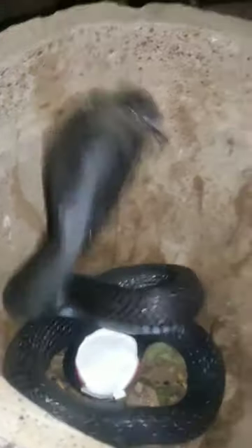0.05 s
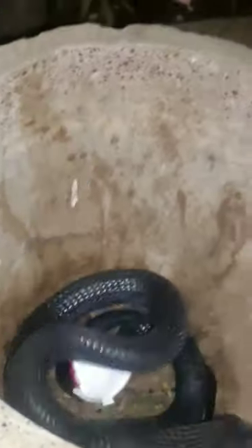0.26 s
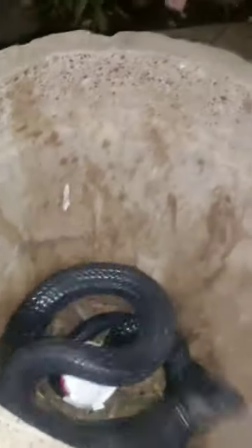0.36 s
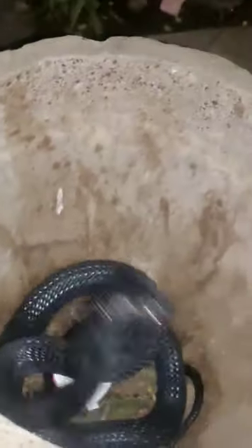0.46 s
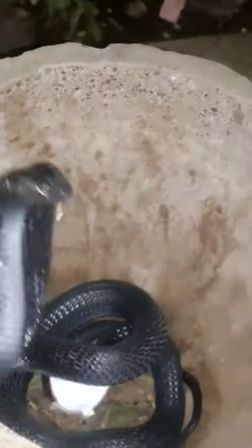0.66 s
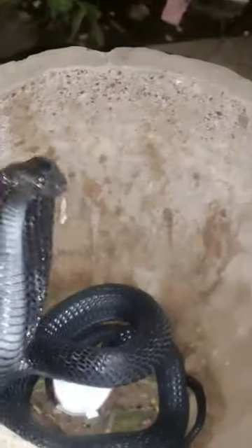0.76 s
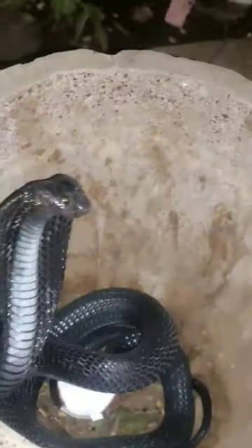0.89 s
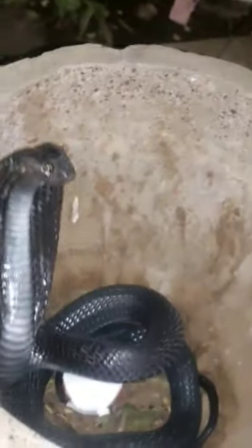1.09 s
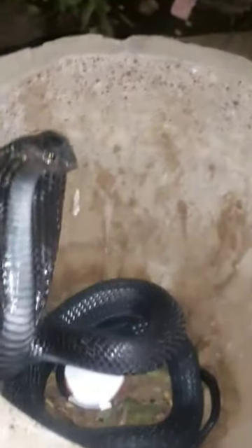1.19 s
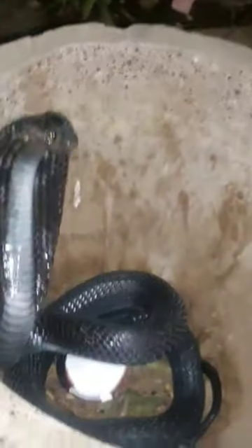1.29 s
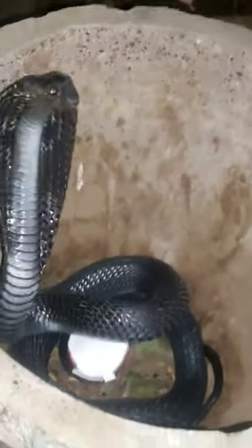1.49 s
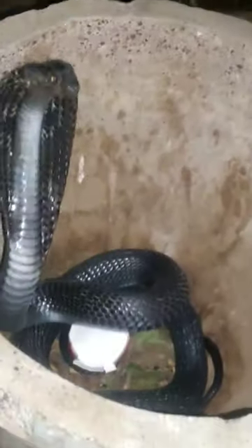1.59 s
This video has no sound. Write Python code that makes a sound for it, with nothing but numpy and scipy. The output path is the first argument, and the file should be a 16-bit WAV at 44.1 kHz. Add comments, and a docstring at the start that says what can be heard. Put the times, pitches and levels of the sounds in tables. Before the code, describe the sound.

One sharp, breathy snake hiss, followed by faint sliding scales over a low outdoor rumble.

```python
"""A concrete basin outdoors, where a coiled cobra lunges with one sharp hiss close to the microphone.
Air rushes through its windpipe and open mouth: a hollow throat tone, a breathy whistle, a wide sizzle.
Then its scales slide and scuff as it rears up again, and the curved wall throws back short echoes.
Two small ticks sound over a low rumble, a thin wash of air and a faint rising drone."""
import sys
import numpy as np
from scipy import signal
from scipy.fft import rfft, irfft
from scipy.io import wavfile
from scipy.ndimage import uniform_filter1d

SR = 44100
rng = np.random.default_rng(int(sys.argv[2]) if len(sys.argv) > 2 else 0)


def waveform_to_disk(signal):
    """Save audio, clipped to [-1, 1], as 16-bit WAV at the path in sys.argv[1]."""
    frames = np.transpose(np.atleast_2d(signal))
    scaled = np.clip(frames, -1, 1) * 32767
    samples = np.round(scaled).astype(np.int16)
    wavfile.write(sys.argv[1], SR, samples)


N = 72765
TIME, HZ = np.arange(N) / SR, np.fft.rfftfreq(N, 1 / SR)


def amp(db):
    """Decibels to gain."""
    return 10 ** (np.asarray(db) / 20)


def unit(x):
    """Scales to rms 1."""
    return x / np.sqrt(np.mean(x ** 2) + 1e-20)


def over_hz(points):
    """Reads a table along log frequency."""
    hz, value = np.transpose(points)
    return np.interp(np.log(HZ + 1), np.log(hz + 1), value)


def over_time(points, column=1):
    """Reads one column of a table along time."""
    rows = np.array(points)
    return np.interp(TIME, rows[:, 0], rows[:, column])


def breath(points, column=1, fade_db_per_s=250):
    """Gain from a level curve that dies away beyond its ends."""
    outside_s = np.maximum(points[0][0] - TIME, 0) + np.maximum(TIME - points[-1][0], 0)
    return amp(over_time(points, column) - fade_db_per_s * outside_s)


def stroke(start_s, length_s, db):
    """A smooth swell and release."""
    return amp(db) * np.sin(np.pi * np.clip((TIME - start_s) / length_s, 0, 1))


def bell(hz, width_hz):
    """A resonance over frequency, 1 at its centre."""
    return 1 / (1 + (2 * (HZ - hz) / width_hz) ** 2)


def flutter(depth_db, rate_hz):
    """A random flicker in level."""
    wobble = irfft(rfft(rng.standard_normal(N)) * bell(0, 2 * rate_hz), N)
    return amp(depth_db * unit(wobble))


def steadied(x, size=2600):
    """Holds the slow level of a narrow noise band constant."""
    return x / np.sqrt(abs(uniform_filter1d((x ** 2).mean(0), size)) + 1e-12)


# Stereo width, near and far. Each row: frequency in Hz, correlation of left and right.
NEAR_LIKENESS = [(30, .9), (80, .99), (450, .985), (1000, .95), (1400, .6), (2800, .5), (4000, .2),
                 (7000, .1), (14000, .15)]
DISTANT_LIKENESS = [(20, .65), (45, .9), (80, .99), (130, .98), (250, .88), (600, .72), (1200, .45),
                    (3000, .15), (14000, .1)]
# Panning, near and far. Each row: frequency in Hz, left minus right in dB.
NEAR_PAN = [(150, 0), (380, 3), (600, -1), (1000, -2.5), (1300, -5), (1700, 3), (2100, 5), (2600, 0),
            (3700, -4), (4500, 1), (6400, -1), (7100, 1), (7750, 7), (9000, 4), (12000, 2)]
DISTANT_PAN = [(30, 7), (80, -1.2), (400, 1.5), (1500, -2), (4000, 2), (6400, 0), (7700, 8.5), (12000, 1.5)]


def noise(spectrum, likeness=NEAR_LIKENESS, pan=NEAR_PAN):
    """Stereo noise of a given colour, width and panning, at rms 1."""
    common, separate = rfft(rng.standard_normal((2, N)))
    same, lean = np.clip(over_hz(likeness), -1, 1), amp(over_hz(pan))
    right = same * common + np.sqrt(1 - same ** 2) * separate
    pair = np.array([lean * common, right]) / np.sqrt(1 + lean ** 2)
    return unit(irfft(pair * spectrum, N))


# Colours of the outdoor bed. Each row: frequency in Hz, relative level in dB.
RUMBLE_EQ = [(15, -27), (30, 2), (50, -8.5), (75, 6), (95, -1.5), (118, 0), (145, -12), (200, -15.5),
             (300, -27), (600, -53.5)]
AIR_EQ = [(180, -43), (300, -5), (629, -9.5), (670, -11), (750, -9.5), (1050, -14), (2130, -16),
          (2510, -18.5), (3870, -15), (4330, -23.5), (6580, -13), (8780, -27), (14000, -35)]
# The rumble's slow swells. Each row: time in seconds, level in dB.
RUMBLE_SWELLS = [(0, -44), (.12, -42), (.31, -51), (.45, -45.5), (.56, -43), (.85, -41.5), (1.15, -44),
                 (1.42, -45.5), (1.52, -50), (1.62, -41.5)]


def outdoors(air_db=-57.5):
    """A low distant rumble and a thin, even wash of air."""
    rumble = noise(amp(over_hz(RUMBLE_EQ)), DISTANT_LIKENESS, DISTANT_PAN)
    rumble = steadied(rumble, size=3600) * amp(over_time(RUMBLE_SWELLS))
    air = noise(amp(over_hz(AIR_EQ)), DISTANT_LIKENESS, DISTANT_PAN) * amp(air_db)
    return rumble + air * flutter(depth_db=0.85, rate_hz=13)


# The drone's climb. Each row: time in seconds, unsounded fundamental in Hz, base level in dB.
DRONE_CLIMB = [(0, 130.2, -73), (.7, 139.4, -69.5), (1.0, 141.9, -72), (1.25, 152.9, -66),
               (1.65, 158.1, -64.5)]
# Its overtones. Each row: multiple of the fundamental, level against the base in dB.
DRONE_OVERTONES = [(4, -3), (5, -8.5), (6, -14.5)]


def drone():
    """A few wavering overtones, perhaps a distant engine gathering speed."""
    turns = np.cumsum(over_time(DRONE_CLIMB)) / SR
    out = np.zeros(N)
    for multiple, db in DRONE_OVERTONES:
        waver = np.fft.ifft(rfft(rng.standard_normal(N)) * bell(0, width_hz=12), N)
        out += amp(db) * unit((waver * np.exp(2j * np.pi * multiple * turns)).real)
    return out * amp(over_time(DRONE_CLIMB, column=2))


# Two small ticks. Each row: start in seconds, base level in dB.
TICK_CUES = [(1.047, -38), (1.242, -47)]
# Their ring. Each row: frequency in Hz, level against the base in dB, seconds to fall 60 dB.
TICK_RING = [(1850, -9.5, 0.025), (2100, -9, 0.024), (3750, -14, 0.029), (4150, -10, .02),
             (5000, -14, 0.013)]


def ticks(attack_s=0.00085, stereo_spread_turns=0.27):
    """Small dry taps with a very short ring."""
    out = np.zeros((2, N))
    for start, level_db in TICK_CUES:
        age = np.maximum(TIME - start, 0)
        attack = np.minimum(age / attack_s, 1)
        for hz, db, t60 in TICK_RING:
            turns = hz * age + rng.random() + rng.random((2, 1)) * stereo_spread_turns
            decay = np.exp(-np.log(1000) * age / t60)
            out += np.sin(2 * np.pi * turns) * attack * decay * amp(level_db + db)
    return out


def basin(x, t60_s=0.035, echo_db=-3, low_cut_hz=1500, head_shift_s=0.13):
    """Short, bright echoes off the curved wall; their pattern changes as the head travels."""
    age = np.arange(1500) / SR
    patterns = rng.standard_normal((14, 2, len(age))) * np.exp(-np.log(1000) * age / t60_s)
    wet = amp(echo_db) * HZ ** 2 / (HZ ** 2 + low_cut_hz ** 2)
    out = irfft(rfft(x) * np.sqrt(1 - wet ** 2), N)  # the direct sound
    for k, pattern in enumerate(patterns):
        crossfade = np.cos(np.pi / 2 * np.clip(TIME / head_shift_s - k, -1, 1))
        wall = rfft(pattern / np.linalg.norm(pattern[0]), N)
        out += irfft(rfft(x * crossfade) * wall * wet, N)
    return out


# Colours of the scuff and the slap. Each row: frequency in Hz, relative level in dB.
SCUFF_EQ = [(200, -29), (500, 3), (750, -9), (1100, -15), (1500, 0), (2300, -7.5), (4200, 1), (5250, 1.5),
            (6200, -1), (7600, 3.5), (9200, -13), (14500, -16)]
SLAP_EQ = [(200, -23), (480, 7.5), (750, -4), (1100, -7), (1450, 2), (2500, -12), (5300, 3), (9000, -18),
           (14000, -18)]


def body_landing(start_s=0.842, hit_s=0.859, hold_s=0.018, scuff_db=-44.5, slap_db=-44):
    """One harder scuff of the body, which lands with a soft slap as the scuff peaks."""
    age = TIME - hit_s
    press = np.clip((TIME - start_s) / (hit_s - start_s), 0, 1)
    release_db = 389 * np.maximum(age - hold_s, 0)  # 389 dB a second; the slap dies faster
    scuff = noise(amp(over_hz(SCUFF_EQ)), pan=DISTANT_PAN) * press * amp(scuff_db - release_db)
    slap = noise(amp(over_hz(SLAP_EQ))) * (age > 0) * amp(slap_db - 600 * abs(age))
    return scuff + slap


# Scales sliding on concrete. Each row: start in seconds, length in seconds, level in dB.
SLIDE_CUES = [(-.06, 0.29, -56), (0.634, .08, -54.5), (0.681, 0.19, -49.5), (0.888, .11, -62.5),
              (0.993, 0.082, -58), (1.308, 0.061, -57.5), (1.367, 0.091, -64)]
# Their colour. Each row: frequency in Hz, relative level in dB.
SLIDE_EQ = [(300, -8), (1200, -18), (2200, -3), (3000, -5), (3900, 1.5), (4800, -3), (6600, 1.5), (7700, 5),
            (9000, -14.5), (12000, -9.5), (14500, -17)]


def scales():
    """The coils rub grainily on the basin and on each other, ending in a faint, thin rustle."""
    slides = noise(amp(over_hz(SLIDE_EQ)), pan=DISTANT_PAN) * sum(stroke(*row) for row in SLIDE_CUES)
    landing = body_landing()
    rustle = noise(bell(3765, width_hz=295)) * stroke(start_s=1.286, length_s=0.31, db=-65.5)
    return (slides + landing + rustle) * flutter(depth_db=2.0, rate_hz=160)


# The throat's colour. Each row: frequency in Hz, relative level in dB.
THROAT_EQ = [(150, -27), (260, -21.5), (320, -7.5), (375, -0.5), (420, 1.5), (460, -9), (505, -6.5),
             (590, -26), (800, -42)]
# Envelopes of throat and whistle. Each row: time in seconds, level before trim in dB.
THROAT_ENVELOPE = [(.09, -62), (.16, -46.5), (.19, -47), (.255, -32.5), (.34, -32.5), (.43, -32.5),
                   (.48, -33.5), (.56, -40.5), (.61, -48), (.645, -58)]
WHISTLE_ENVELOPE = [(.17, -67), (.25, -46), (.3, -44.5), (.345, -38.5), (.362, -28.5), (.41, -31.5),
                    (.48, -47), (.56, -46.5), (.6, -56.5), (.64, -69)]


def airway_tones(throat_trim_db=-0.5, whistle_trim_db=0.5):
    """Breath sounds a hollow throat tone and a narrow, airy whistle."""
    throat = steadied(noise(amp(over_hz(THROAT_EQ)))) * breath(THROAT_ENVELOPE)
    whistle = steadied(noise(bell(1000, width_hz=44))) * breath(WHISTLE_ENVELOPE)
    return throat * amp(throat_trim_db) + whistle * amp(whistle_trim_db)


# The sizzle's colour. Each row: frequency in Hz, relative level in dB.
SIZZLE_EQ = [(3500, -33), (5200, -12), (5800, -2), (6800, -4), (7700, 3.5), (8300, -3.5), (9000, -8),
             (10200, -12), (11500, -8), (14500, -12.5)]
# Its sharp edge. Each row: time in seconds, centre in Hz, level against the wide band in dB.
EDGE_GLIDE = [(.23, 6650, -1.5), (.28, 6750, -24), (.32, 6760, -2.5), (.37, 6650, -9), (.405, 6260, 1),
              (.45, 6230, 0.5), (.49, 6340, -5), (.58, 6630, -3.5)]


def mouth_sizzle():
    """The bright top of the hiss; its sharpest resonance sinks and flares as the mouth moves."""
    glide_hz = over_time(EDGE_GLIDE)
    band = signal.hilbert(noise(bell(glide_hz.mean(), width_hz=780)))
    frequency_shift = np.exp(2j * np.pi * np.cumsum(glide_hz - glide_hz.mean()) / SR)
    edge = (band * frequency_shift).real * amp(over_time(EDGE_GLIDE, column=2))
    return noise(amp(over_hz(SIZZLE_EQ))) + edge


# The air flow. Each row: time in seconds, then rush and sizzle levels before trim in dB.
AIRFLOW = [(0.1, -62.5, -63), (0.216, -48, -46.5), (0.232, -37.5, -31.5), (0.252, -31, -29),
           (0.294, -25.5, -24.5), (0.384, -25, -29), (0.398, -28.5, -24.5), (0.414, -26, -29.5),
           (0.598, -48, -44.5), (0.646, -64, -65.5), (0.66, -66, -64.5)]
# The rush's colour. Each row: frequency in Hz, relative level in dB.
RUSH_EQ = [(250, -14.5), (450, 5.5), (650, -2.5), (880, 1.5), (1250, 2.5), (1800, -2.5), (2300, 0.5),
           (3100, 4), (3900, 1), (4250, 3), (4800, 3), (5600, -1), (7000, -33)]
# Resonances of mouth and basin. Each row: centre in Hz, width in Hz, boost or cut in dB.
RUSH_RESONANCES = [(1240, 27, 2.5), (1583, 88, 9.5), (2050, 33, 6), (2615, 100, 12), (2645, 135, -10.5),
                   (2750, 32, 3), (3080, 39, 6), (3870, 113, 10), (4220, 120, -6)]


def hiss(rush_trim_db=-0.5, sizzle_trim_db=1.5):
    """Turbulent air through windpipe and mouth, with a hollow push as the mouth opens wide."""
    resonance_db = sum(db * bell(hz, width) for hz, width, db in RUSH_RESONANCES)
    rush = noise(amp(over_hz(RUSH_EQ) + resonance_db)) * breath(AIRFLOW) * amp(rush_trim_db)
    sizzle = mouth_sizzle() * breath(AIRFLOW, column=2) * amp(sizzle_trim_db)
    tones = airway_tones()
    push = noise(bell(910, width_hz=250)) * stroke(start_s=0.276, length_s=0.052, db=-33)
    return (rush + sizzle + push) * flutter(depth_db=0.85, rate_hz=130) + tones


def scene():
    """The snake in its echoing basin, over the ticks and the outdoor bed."""
    return basin(hiss() + scales()) + ticks() + outdoors() + drone()


def record(dry, cutoff_hz=14400):
    """A steep low-pass takes off the very top."""
    low_pass = signal.firwin(511, cutoff_hz, window=("kaiser", 9), fs=SR)
    return signal.oaconvolve(dry, low_pass[None], "same")


dry = scene()
out = record(dry)
waveform_to_disk(out)
```